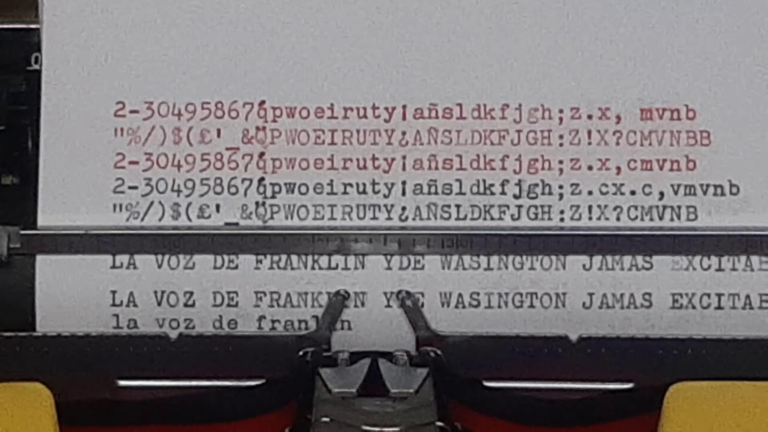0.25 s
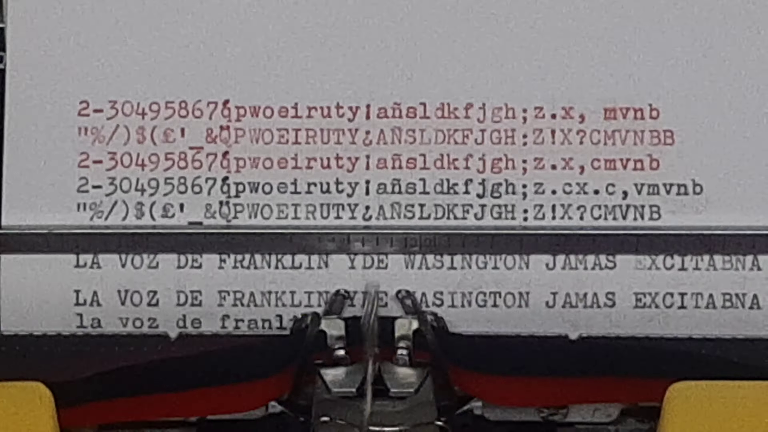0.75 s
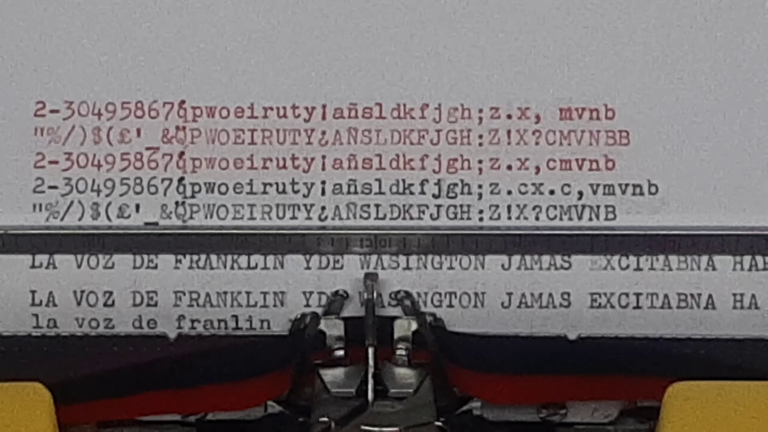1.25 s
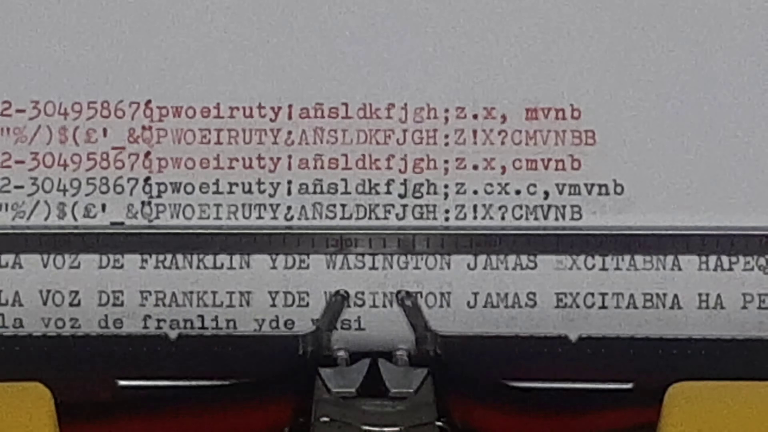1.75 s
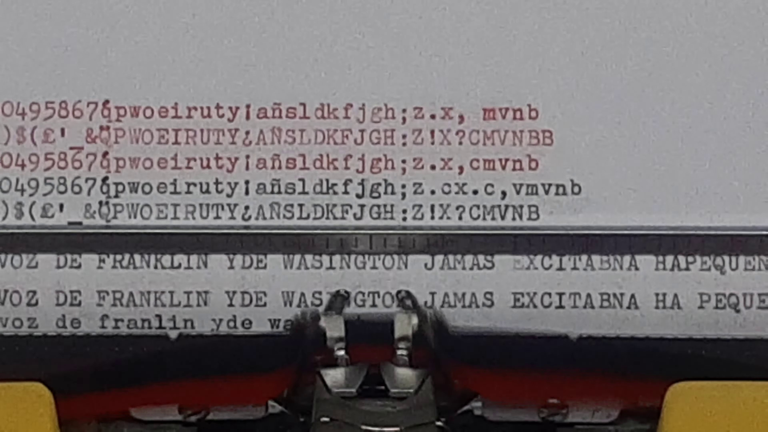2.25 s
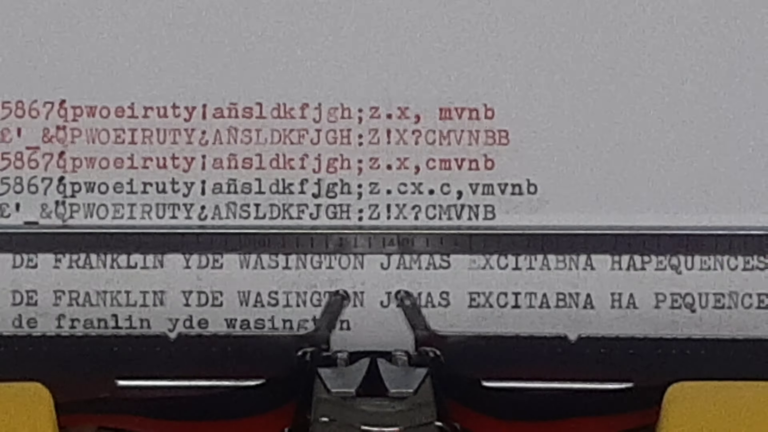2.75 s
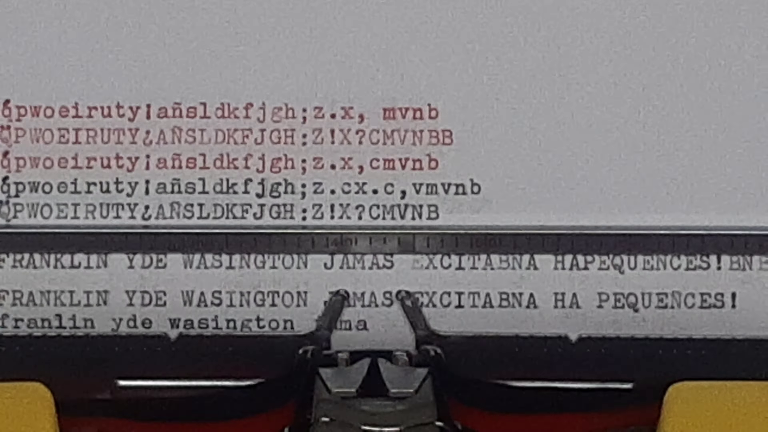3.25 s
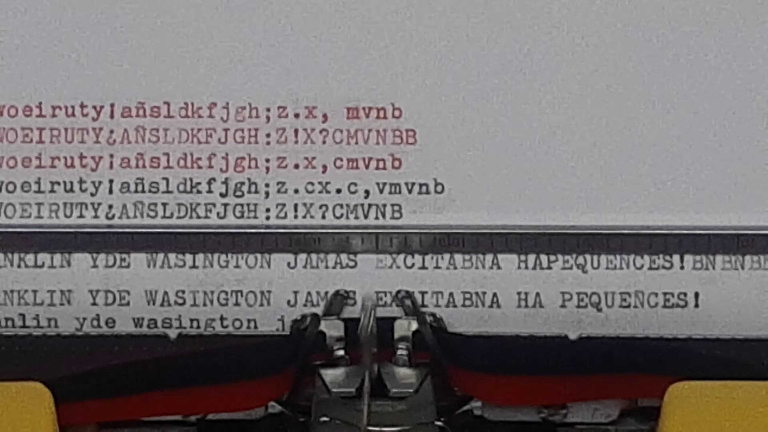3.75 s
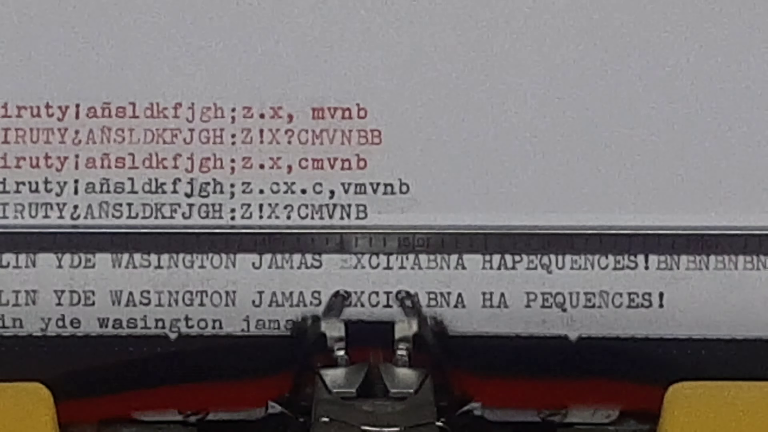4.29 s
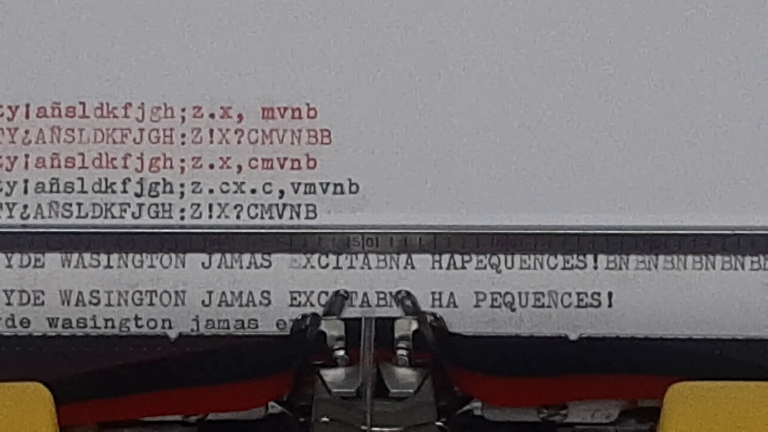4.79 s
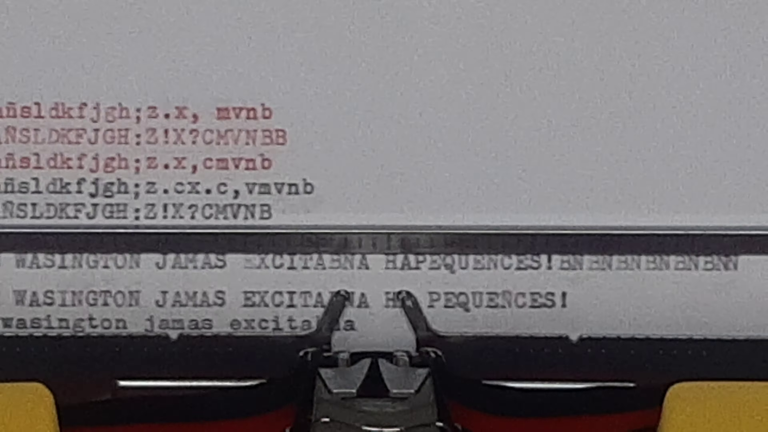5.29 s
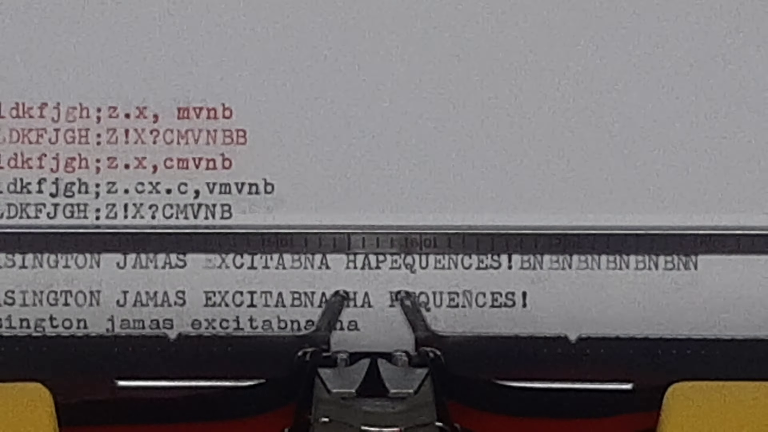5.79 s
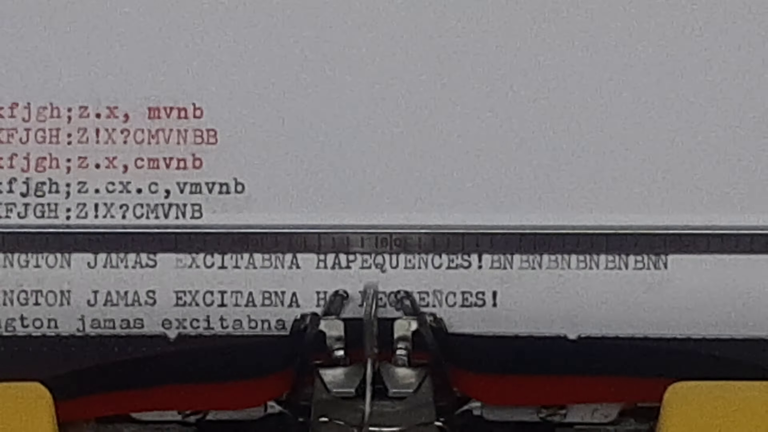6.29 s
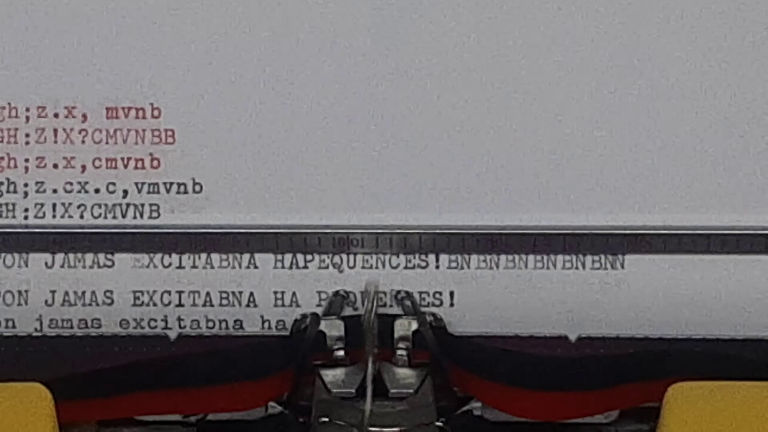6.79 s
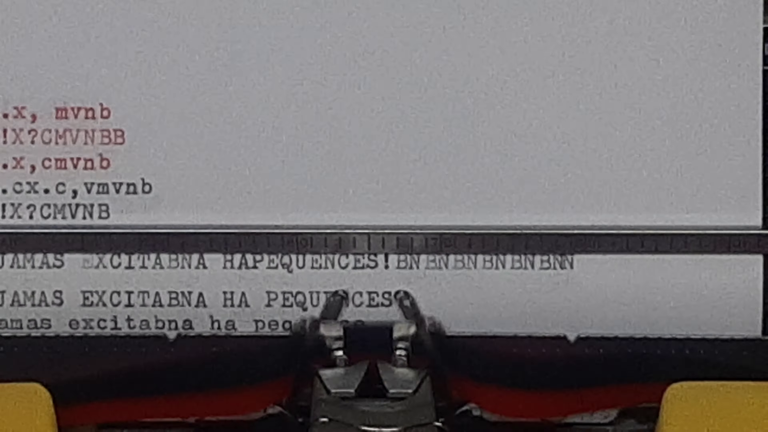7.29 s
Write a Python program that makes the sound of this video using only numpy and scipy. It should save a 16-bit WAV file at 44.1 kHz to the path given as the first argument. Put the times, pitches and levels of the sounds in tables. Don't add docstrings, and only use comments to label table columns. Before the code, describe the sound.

A manual typewriter is heard very close in a small, quiet furnished room. A key snaps at once, then the space bar clacks at 0.2 s, down and softly up. Key strikes follow at roughly four or five per second, each a faint linkage rattle, a sharp knock and crack on paper and roller, and a small clatter as the bar falls back. Softer space bar clacks come at 0.9 s, firmer ones at 2.75 and 3.6 s, with strong strikes around 3.5 and 4.25 s. Typing runs on evenly to 5.7 s, with space clacks at 5.3 and 5.8 s, then a brief pause with only slight lever noise. Strikes resume near 6.25 s and continue to a hard final one at 7.5 s. A thin high spring ring, dull desk hum, short room tail and low rumble lie beneath.

```python
import sys
import numpy as np
from scipy import signal
from scipy.fft import rfft, irfft, next_fast_len
from scipy.io import wavfile
from scipy.ndimage import uniform_filter1d

SR = 44100
rng = np.random.default_rng(int(sys.argv[2]) if len(sys.argv) > 2 else 0)


def rack_gain(trim_db):
    fader = np.asarray(trim_db, float)
    return 10 ** (fader / 20)


def wav_record(signal):
    frames = np.transpose(np.atleast_2d(signal))
    bounded = np.clip(frames, -1, 1)
    quanta = np.round(bounded * 32767).astype(np.int16)
    wavfile.write(sys.argv[1], SR, quanta)


N = 332514
SPAN = 8192
PORT_LAG_S = 6e-5
FIRM_DB = -9.5

# frequency in Hz, share common to both in 0-1.
PORT_LIKENESS = [(40, 0.88), (150, 1), (500, 0.72), (2000, 0.23), (5000, 0.04), (12000, 0)]
# down in seconds, peak in dB, time held in seconds, level coming up in dB,
# bounce after that in seconds.
SPACES = [
    (0.236, -14, 0.092, -23, 0.012),
    (0.9292, -15, 0.072, -17.5, 0.022),
    (2.7545, -9.5, .0915, -13.5, .031),
    (3.6387, -10, 0.096, -15, 0.02),
    (5.2956, -11.5, .1117, -16, 0.02),
    (5.8229, -11.5, 0.12, -17, 0.017),
]
# slug lands in seconds, peak in dB, clatter in dB, key pressed this many
# seconds before, linkage in dB.
KEY_STROKES = [(0.0351, -19, -12, 0.033, -29.5), (0.4846, -17.5, -15, .035, -27),
               (0.6072, -18.5, -12.5, 0.05, -28), (0.808, -18, -10, .032, -26),
               (1.1286, -17.5, -10.5, 0.04, -24), (1.3463, -19, -10.5, 0.038, -28.5),
               (1.544, -14, -11.5, .033, -26), (1.696, -17, -16, 0.026, -33),
               (1.9053, -16.5, -13, 0.034, -26), (2.0468, -19.5, -13.5, 0.03, -33),
               (2.2436, -14.5, -13, 0.034, -27.5), (2.398, -16, -16.5, 0.042, -26.5),
               (2.6212, -15.5, -14, .035, -27), (2.9434, -15, -14, 0.038, -24),
               (3.0303, -16, -13, 0.022, -28.5), (3.1682, -17, -14.5, 0.027, -28),
               (3.252, -14.5, -12.5, 0.013, -28.5), (3.472, -12.5, -13, 0.03, -24),
               (3.8234, -15.5, -14.5, 0.034, -26.5),
               (4.048, -17.5, -13.5, 0.04, -29), (4.2562, -13.5, -13, 0.031, -25.5),
             (4.4203, -14, -16, 0.031, -27.5), (4.521, -18.5, -14, 0.024, -27),
             (4.7238, -16, -13.5, .048, -25.5), (4.8606, -15.5, -13, 0.026, -29),
             (5.016, -16.5, -13, 0.03, -35), (5.1258, -14.5, -10.5, 0.022, -29),
             (5.513, -15.5, -11.5, 0.032, -25.5), (5.672, -16.5, -11.5, 0.041, -25),
             (6.2694, -18, -11, 0.04, -28), (6.3699, -16.5, -13, .024, -32),
             (6.5901, -13, -12.5, .045, -22), (6.7294, -22, -17, 0.03, -31), (6.826, -16, -13, 0.035, -25),
             (6.9671, -19.5, -14, 0.032, -32.5), (7.1264, -15.5, -14.5, 0.038, -28.5),
             (7.3127, -14, -12.5, .034, -25.5), (7.5106, -11.5, -10.5, 0.032, -29.5)]
KEYS = KEY_STROKES


def curve(table, hz):
    f, v = np.transpose(table)
    return np.interp(np.log(np.maximum(hz, 1)), np.log(f), v)


def ports(noises, gain):
    size = noises.shape[-1]
    hz = np.arange(size // 2 + 1) * SR / size
    both, left, right = rfft(noises)
    share = np.clip(curve(PORT_LIKENESS, hz), 0, 1)
    common, alone = np.sqrt(share) * both, np.sqrt(1 - share)
    left = common * np.exp(2j * np.pi * hz * PORT_LAG_S) + alone * left
    right = common + alone * right
    g = gain(hz)
    return irfft(np.array([left, right]) * g / np.sqrt(np.mean(g ** 2)), size)


def add(track, s, sound):
    i = int(s * SR)
    track[..., i:i + sound.shape[-1]] += sound[..., :N - i]


def room_colour(hz):
    # frequency in Hz, level in dB per Hz.
    still_air = [(35, -46), (60, -16), (87, 7), (113, -11), (198, -4.5), (217, -5.5), (268, -3.5),
                 (338, -8.5), (492, -8), (1500, -19.5), (3500, -25.5), (10000, -37), (16000, -52)]
    # centre in Hz, width in Hz, level in dB.
    broad_bands = [(1400, 150, 8), (2300, 300, 7), (3500, 300, 8)]
    hums = sum(db * np.exp(-((hz - centre) / width) ** 2) for centre, width, db in broad_bands)
    return rack_gain(curve(still_air, hz) + hums) * (hz > 55)


def rumble_colour(hz):
    return rack_gain(curve([(12, -32), (30, -6.0), (58, 0.0), (70, -30), (200, -77)], hz))


def background():
    size = next_fast_len(N)
    tone = ports(rng.standard_normal((3, size)), room_colour)[:, :N]
    deep = ports(rng.standard_normal((3, size)), rumble_colour)[:, :N]
    settle_s = 1.8
    rumble_db = -59.5 + 5.5 * np.exp(-np.arange(N) / SR / settle_s)
    return rack_gain(-56.5) * tone + rack_gain(rumble_db) * deep


def room(dry, t60, wet_db):
    t = np.arange(SPAN * 3) / SR
    dull = [(200, -4), (2000, -4.5), (12000, -9.5)]  # (Hz, dB)
    tail = ports(rng.standard_normal((3, len(t))), lambda hz: rack_gain(curve(dull, hz)))
    tail = tail * np.exp(-np.log(1000) * t / t60) * (t > .006)
    tail = tail / np.sqrt(np.sum(tail ** 2) / 2)
    return dry + rack_gain(wet_db) * signal.fftconvolve(dry.mean(axis=0)[None], tail, axes=1)[:, :N]


def desk(air):
    # frequency in Hz, level in dB.
    desk_colour = [(55, -17), (95, -2), (130, -2), (178, 1.5), (210, -12.5), (330, -18.5), (600, -47)]
    keep = np.exp(-1 / (0.013 * SR))
    shake = signal.lfilter([1 - keep], [1, -keep], np.mean(air ** 2, axis=0))
    shake = signal.lfilter([1 - keep], [1, -keep], shake)
    noises = rng.standard_normal((3, next_fast_len(N)))
    hum = ports(noises, lambda hz: rack_gain(curve(desk_colour, hz)))[:, :N]
    return rack_gain(-28.0) * np.maximum(shake, 0) ** 0.37 * hum


def spring():
    # time in seconds, ring level in dB.
    spring_blows = [(0.484, -56), (0.808, -65), (1.128, -55), (1.695, -61), (2.244, -66), (2.397, -67),
                    (2.943, -51), (3.029, -57), (3.252, -52), (3.472, -52), (3.824, -51.5), (4.047, -56),
                    (4.42, -52), (4.521, -68), (4.724, -57), (5.672, -50), (6.269, -50), (6.37, -54),
                    (6.59, -54), (6.967, -60), (7.313, -60)]
    hz, t60, right_db = 4754, .9, -14
    s = np.sort([row[0] for row in KEYS + SPACES])
    db = np.full(len(s), -76.0)
    for at, ring_db in spring_blows:
        db[np.argmin(abs(s - at))] = ring_db
    t = np.arange(N) / SR
    last = np.maximum(np.searchsorted(s, t) - 1, 0)
    after = np.maximum(t - s[last], 0)
    drift = uniform_filter1d(rng.standard_normal(N), 2000) * 30
    level = rack_gain(db[last] + 2.5 - 60 * after / t60) * (1 - np.exp(-after / .004))
    tone = level * np.sin(2 * np.pi * hz * t + drift)
    tone = tone * rack_gain(3 * drift / 1.2)
    return tone * rack_gain(np.array([[0], [right_db]]))


def ring(push, modes, shake_db, rate_hz):
    out, hold = 0, int(SR / rate_hz)
    for hz, db, t60 in modes:
        turn, keep = 2 * np.pi * hz / SR, np.exp(-np.log(1000) / (t60 * SR))
        waver = np.repeat(rng.standard_normal(N // hold + 1), hold)[:N]
        waver = uniform_filter1d(waver, hold)
        mode = signal.lfilter([.5, 0, -.5], [1, -2 * keep * np.cos(turn), keep ** 2], push)
        out = out + rack_gain(db + shake_db * waver) * mode
    return out


def shove(length_s):
    t = np.arange(SPAN // 8) / SR
    push = t / length_s * np.exp(-t / length_s)
    return (0.93 + rng.standard_normal(len(t))) * push / np.sqrt(length_s * SR)


def chatter(envelope, colour, dull_db, bright_db, grain_db):
    single, cluster = (np.repeat(rng.standard_normal(SPAN // k), k) for k in (32, 128))
    ticks = np.repeat(rng.random(SPAN // 16) < .03, 16)
    sizes = rack_gain(grain_db * single + 1.12 * cluster + 4 * ticks)
    tilt = [(700, dull_db), (2200, 0.02), (7000, bright_db)]
    contacts = rng.standard_normal((3, SPAN)) * sizes / np.sqrt(np.mean(sizes ** 2))
    return envelope * ports(contacts, lambda hz: rack_gain(curve(colour, np.minimum(hz, 14600)) + curve(tilt, hz)))


def clacks(air, frame, table, colour, rise_share, tail_db, frame_db):
    t = np.arange(SPAN) / SR
    for s, db, length, dull_db, bright_db, own_db in table:
        length = max(length, .002)
        rise = 1 - np.exp(-t / (rise_share * length))
        fade = rise * (np.exp(-(t / length) ** 1.44) + rack_gain(tail_db) * np.exp(-t / 0.022))
        add(air, s, rack_gain(db - 13.0) * chatter(fade, colour, dull_db, bright_db, 2.4))
        add(frame, s, rack_gain(db + own_db + frame_db) * shove(0.0028))


def levers():
    # start in seconds, peak in dB.
    escapement = [(0.11, -39), (0.684, -37), (1.208, -39), (1.43, -41), (1.442, -41), (1.636, -37.5),
                  (1.763, -39), (1.991, -39), (2.126, -37), (2.33, -37.5), (2.456, -39.5), (2.703, -38.5),
                  (3.547, -41), (3.899, -38.5), (4.131, -37), (4.931, -35), (5.2115, -37.5), (5.583, -39),
                  (5.754, -40.5), (6.442, -38), (7.04, -40), (7.394, -36), (1.814, -47), (3.21, -48),
                  (4.562, -37.5), (6.625, -43), (6.656, -55), (6.759, -32.5)]
    # start in seconds, peak in dB, length in seconds.
    bar_falls = [(0.125, -31.5, 0.015), (0.706, -32, .015), (0.902, -36.5, 0.059), (1.234, -30.5, 0.01),
                 (1.479, -33.5, 0.013), (1.784, -32, 0.032), (2.14, -29.5, .01), (2.485, -31.5, 0.027),
                 (2.72, -31, 0.036), (3.116, -31, 0.032), (3.3563, -33.5, 0.015), (3.578, -36, 0.017),
                 (3.928, -32, 0.015), (4.1696, -33.5, 0.037), (4.3427, -31, 0.075), (4.605, -33, 0.025),
                 (4.9463, -28.5, 0.018), (5.25, -31.5, 0.0042), (5.5996, -31, 0.012), (5.794, -31, 0.04),
                 (6.463, -31, .012), (7.0654, -35.5, 0.022), (7.21, -30.5, 0.044), (7.418, -32.5, .012)]
    # start in seconds, peak in dB, length in seconds.
    lever_slack = [(0.166, -49, .02), (0.228, -34.5, .006), (0.318, -40, 0.0077), (0.474, -27, 0.025),
                   (0.519, -32, 0.0099), (4.091, -32, 0.017), (1.327, -38, 0.012), (2.843, -31, 0.055),
                   (3.6302, -32, .008), (3.728, -39, .01), (5.9293, -36.5, 0.063), (6.245, -29, 0.02),
                   (6.548, -36, .015)]
    rows = [(s - lead, db, 0.99 * lead, -4, -1.5, -18) for s, _, _, lead, db in KEYS]
    rows += [(s, db, .012, -6.5, -5, -1.5) for s, db in escapement]
    rows += [(*row, 5.4, -1.5, 4.3) for row in bar_falls]
    return rows + [(*row, -3.8, -3.5, 0.5) for row in lever_slack]


def space_bar():
    rows = []
    for s, db, held, up_db, bounce in SPACES:
        rows.append((s, db, 0.01, 3.1, -1.9, 3.1 * (db - FIRM_DB)))
        rows.append((s + held, up_db, .015, 9.5, 0.98, 1.5))
        rows.append((s + held + bounce, up_db - 5.5, 0.012, 13, -1, 4.3))
    return rows


def space_thuds():
    down, up = np.zeros((2, N))
    push = np.exp(-np.arange(400) / SR / 0.0001) / 6
    for s, db, held, up_db, _ in SPACES:
        add(down, s + 0.00199, rack_gain(db + (db - FIRM_DB) + 5.0) * push)
        add(up, s + held + 0.00397, rack_gain(up_db + 8.0) * push)
    return down, up


def strikes(air, frame, roller):
    # frequency in Hz, level in dB per Hz.
    clatter_colour = [(180, -32), (300, -14), (528, -8), (787, -11.5), (1150, -5.5), (2520, 1.5),
                      (5800, -2.5), (7950, -6), (10400, -8.5), (14000, -17), (16000, -44)]
    t = np.arange(SPAN) / SR
    lead = .005
    after = np.maximum(t - lead, 0)
    landed = t > lead
    short = t[:600]
    thump = short / 0.0017 * np.exp(-short / 0.0015) * np.sin(2 * np.pi * 830 * short) / 20
    swing = landed * np.exp(-((after - .0005) / .0008) ** 2)
    snap = landed * np.exp(-after / .001)
    scrape = rack_gain(-8.5) * np.sqrt(t / lead) * ~landed
    fade = landed * (np.exp(-after / 0.0087) + rack_gain(-23.0) * np.exp(-after / 0.049)) + scrape
    late = after - np.array([[0], [PORT_LAG_S]])
    for s, db, clatter_db, *_ in KEYS:
        hz = 2360 - 25.8 * s
        thump_db = -15 - 0.23 * (s - 4.8) ** 2
        s = s + .0005
        turn, start = 2 * np.pi * hz * late, rng.uniform(0, 2 * np.pi, 2)
        knock = swing * (np.sin(turn + start[0]) + rack_gain(-5) * np.sin(1.9 * turn + start[1]))
        crack = chatter(snap, clatter_colour, -8, 12, 2.5)
        clatter = chatter(fade, clatter_colour, 0, 0, 1.96)
        blow = rack_gain(db) * (rack_gain(-3) * knock + rack_gain(-7) * crack)
        add(air, s - lead, blow + rack_gain(clatter_db - 12) * clatter)
        add(frame, s, rack_gain(db + 13.0) * shove(0.0019))
        add(roller, s + 0.00208, rack_gain(thump_db) * thump)


def scene():
    # frequency in Hz, level in dB per Hz.
    clack_colour = [(180, -28), (300, -15.5), (713, -8.5), (1780, -2), (2000, 1), (3950, -1), (4300, -3),
                    (4750, -1.5), (7570, -2.5), (12300, -13), (16000, -32)]
    # frequency in Hz, level in dB per Hz.
    linkage_colour = [(180, -28), (300, -9), (1010, -4.5), (1300, 1), (1660, -7), (2520, -1.5),
                      (3700, -4.5), (4090, -3.5), (4520, -2.5), (12100, -5.5), (16000, -20.5)]
    # frequency in Hz, level in dB, decay by 60 dB in seconds.
    frame_modes = [(698, -15, .06), (1065, -14, .05), (1152, -11, .05), (1310, -10, .08), (1722, -10, .05),
                   (2010, -10, .05), (2200, -8, .06), (2430, -9, .06), (3635, -13, .06), (4000, -14, .06)]
    # frequency in Hz, level in dB, decay by 60 dB in seconds.
    roller_modes = [(790, -21.5, .04), (865, -20.5, .05)]
    # frequency in Hz, level in dB, decay by 60 dB in seconds.
    bottom_modes = [(700, -26, 0.11), (1330, -38, 0.3), (1990, -36, .08)]
    # frequency in Hz, level in dB, decay by 60 dB in seconds.
    top_modes = [(706, -36, 0.1), (1320, -33, 0.35)]
    air, (frame, roller) = np.zeros((2, N)), np.zeros((2, N))
    strikes(air, frame, roller)
    clacks(air, frame, space_bar(), clack_colour, 0.24, -9.5, 6.9)
    clacks(air, frame, levers(), linkage_colour, 0.18, 3.04, 14.0)
    body = rack_gain(-21.0) * ring(frame, frame_modes, 4.04, 120) + ring(roller, roller_modes, 1.0, 72)
    down, up = space_thuds()
    body = body + ring(down, bottom_modes, 2, 70) + ring(up, top_modes, 3, 70)
    lag = round(PORT_LAG_S * SR)
    machine = air + np.array([body, np.roll(body, lag)]) + spring()
    return room(machine, 0.28, -15.5) + desk(air) + background()


def band_limit(x):
    return signal.sosfilt(signal.butter(12, 16970, fs=SR, output="sos"), x)


def record(dry):
    # frequency in Hz, gain in dB.
    mic_response = [(20, -3.5), (60, -5.5), (110, 1), (15900, 2), (16150, -26), (16700, -38), (17000, -88)]
    # frequency in Hz, left minus right in dB.
    port_difference = [(60, -0.5), (110, 2), (200, 1.5), (380, -0.5), (700, 2), (1290, 1.5), (2380, 1),
                       (4400, -0.5), (8120, 1.0), (15000, 5.5)]
    size = next_fast_len(N)
    hz = np.arange(size // 2 + 1) * SR / size
    half = curve(port_difference, hz) / 2
    gain = rack_gain(curve(mic_response, hz) + np.array([half, -half]))
    mix = irfft(rfft(dry, size) * gain, size)[:, :N]
    return band_limit(mix)


dry = scene()
out = record(dry)
wav_record(out)
```